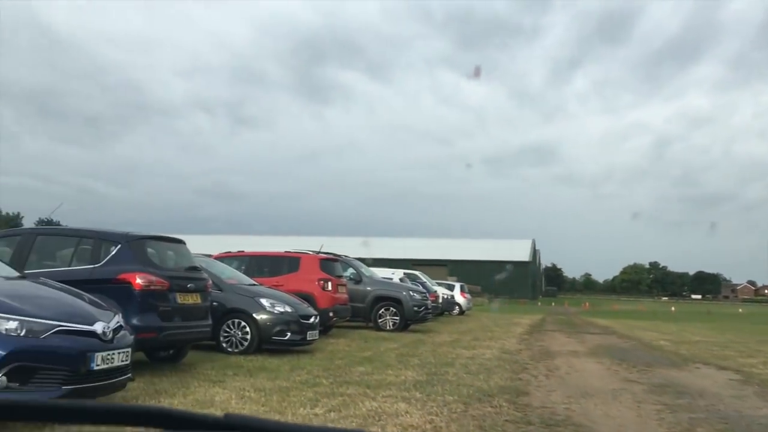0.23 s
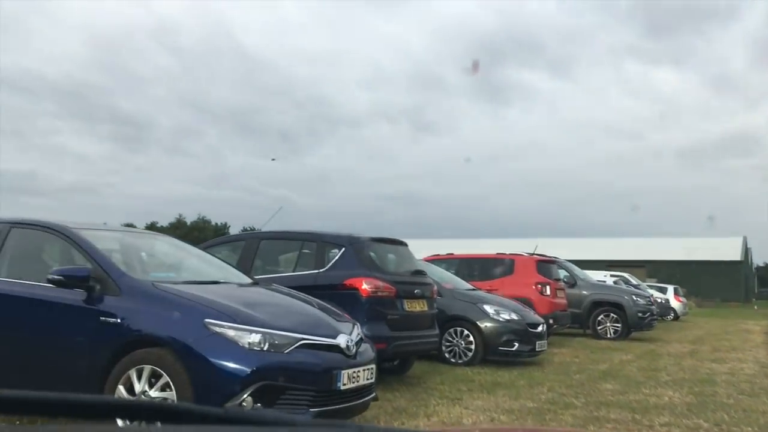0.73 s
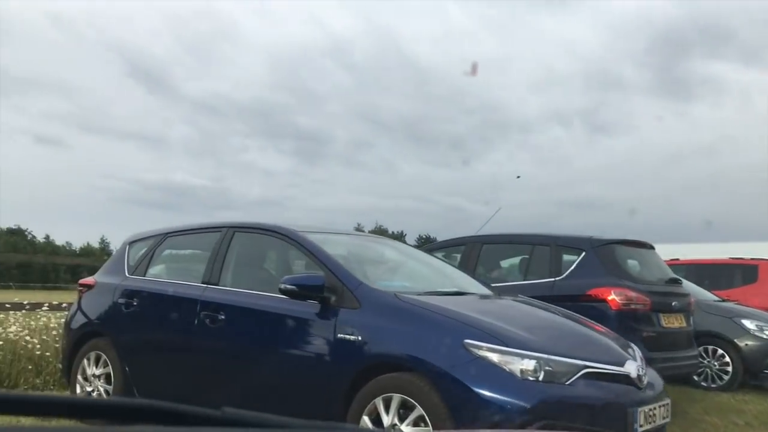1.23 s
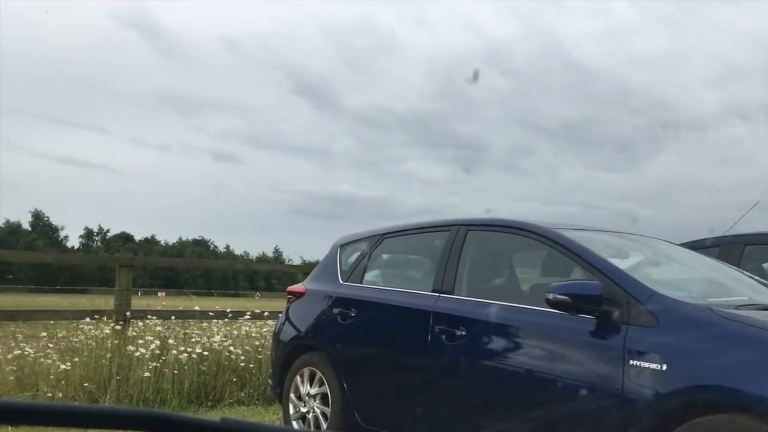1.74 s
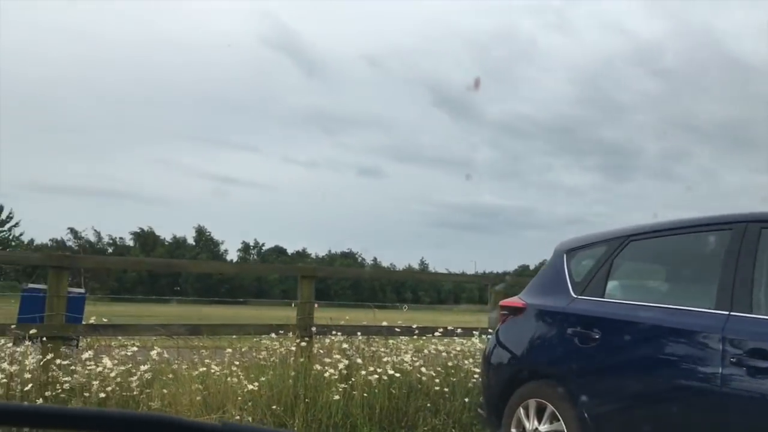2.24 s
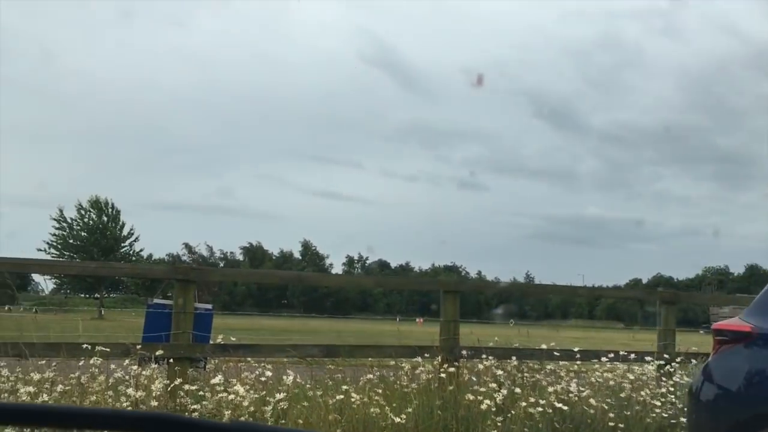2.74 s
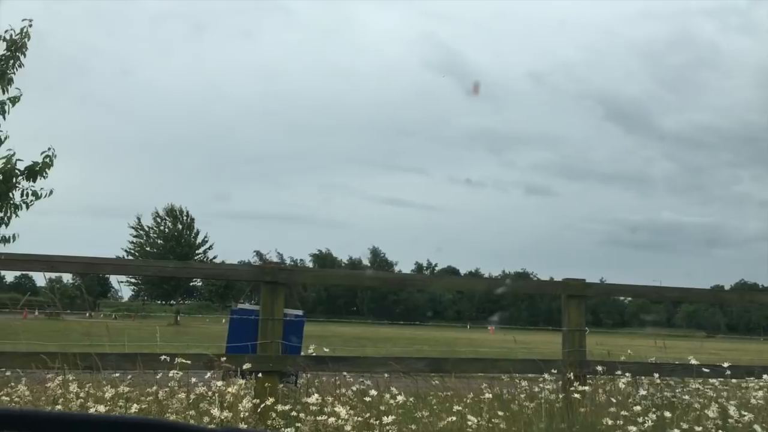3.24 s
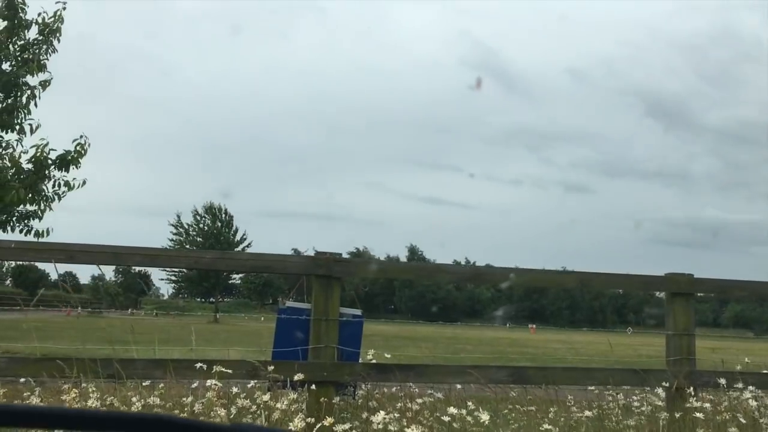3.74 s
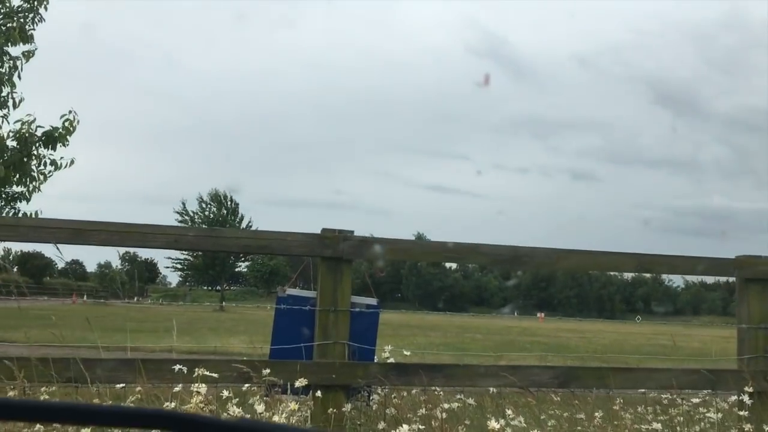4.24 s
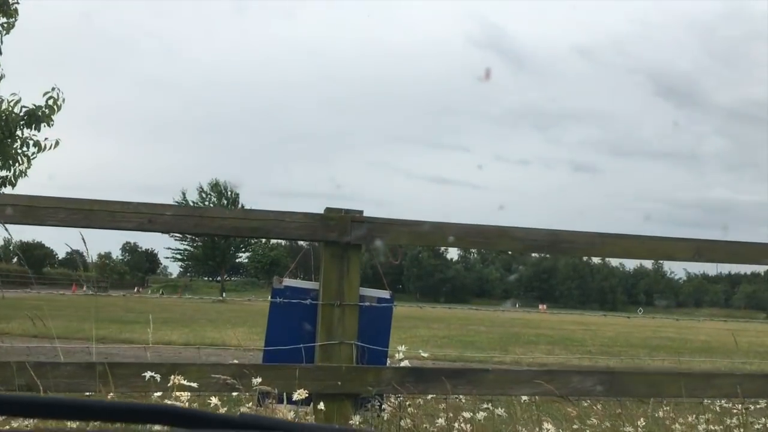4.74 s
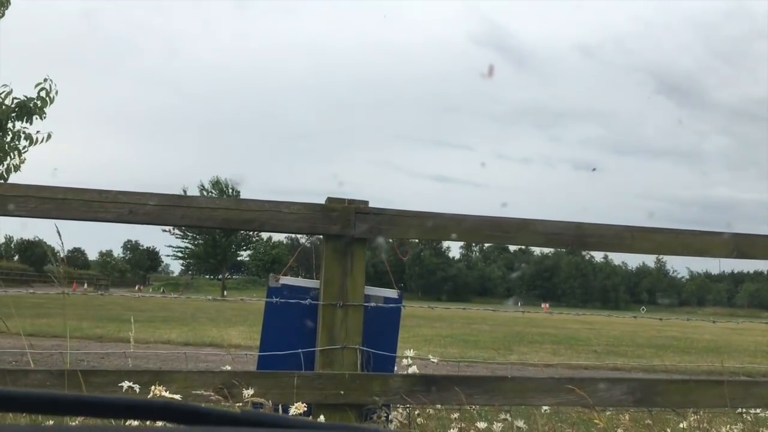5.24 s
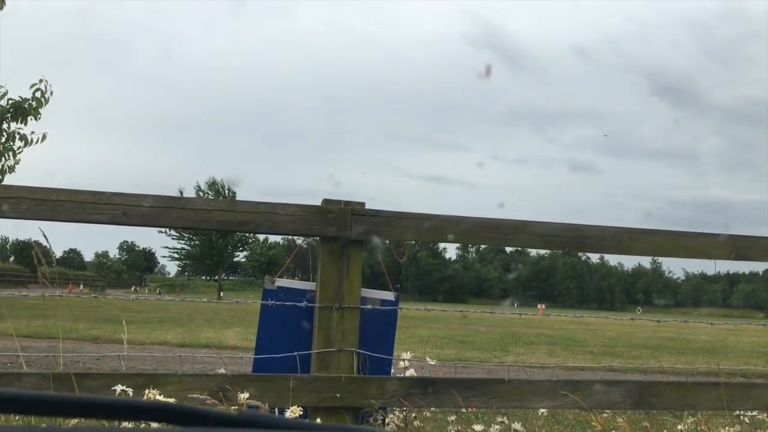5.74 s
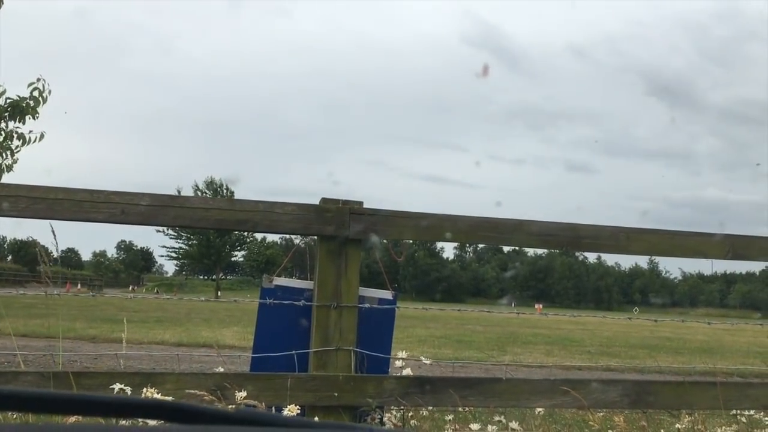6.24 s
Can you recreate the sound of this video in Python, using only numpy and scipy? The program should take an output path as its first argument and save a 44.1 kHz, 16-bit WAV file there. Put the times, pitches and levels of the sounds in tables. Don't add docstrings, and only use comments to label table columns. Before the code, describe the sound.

Inside a closed car cabin, with a close microphone and very short reflections. A low engine drone around 55 Hz wavers throughout, with soft, steady blower hiss above it. From 0 to 2 s bumpy grass gives a lumpy deep rumble, which then weakens. The indicator relay ticks at about 0.25, 0.95, 1.7 and 2.4 s, each followed within 0.07 s by a lower tock; the last tick is strongest, with a dull knock beside it. Tiny bright key clinks start around 1 s and are clearest from 2.9 to 4.8 s, notably at 3.57 and 3.88, then thin out. The engine sags to a lower, quieter idle after 5.3 s. A dull knock and click at 5.5 s precede a fast four-tooth handbrake ratchet at 5.64-5.73, rasping with a hollow thump. From 5.97 to 6.4 s, muffled floor thuds and light plastic clicks cluster, strongest near the end at 6.5 s.

```python
import sys
import numpy as np
from scipy import signal
from scipy.fft import rfft, irfft, next_fast_len
from scipy.io import wavfile

SR = 44100
rng = np.random.default_rng(int(sys.argv[2]) if len(sys.argv) > 2 else 0)


def int16_out(signal):
    q = np.round(np.clip(np.atleast_2d(signal).T, -1, 1) * 32767)
    wavfile.write(sys.argv[1], SR, q.astype(np.int16))


def gain_from_db(level_db):
    decades = np.asarray(level_db, float) / 20
    return 10 ** decades


N = 286764

# (time [s], firing tone [Hz], level [dB])
ENGINE_CURVE = [(0.0, 56.52, -31), (1.6, 55.67, -29), (2.0, 56.22, -32.5), (2.48, 55.78, -29),
                (3.29, 55.56, -33), (3.55, 54.26, -29), (3.89, 52.1, -32), (4.11, 54.53, -32),
                (4.36, 57.66, -36.5), (4.5, 58.6, -29.5), (4.8, 56.2, -31), (5.14, 55.94, -33.5),
                (5.23, 54.4, -31.5), (5.45, 48.1, -32.5), (5.7, 46.75, -38), (6.5, 46.93, -39)]
# (multiple of the firing tone [times], level [dB])
ENGINE_OVERTONES = [(2.0, -38), (4.0, -24.5)]
# (time [s], spread [s], change of the drone [dB])
DRONE_SWELLS = [(.025, 0.0066, 14), (.1, 0.04, -4), (.36, 0.048, 4.5), (.49, 0.036, 4), (.6, 0.039, 6.5),
                (.71, 0.023, -7), (.8, 0.042, 5), (.92, 0.039, -2), (1.04, 0.018, 1.5), (1.13, 0.027, -4),
                (1.24, 0.025, 5), (1.38, 0.066, -3.5), (1.5, 0.049, -5), (1.65, 0.019, -14),
                (1.8, 0.053, 5), (1.92, 0.015, -10), (5.97, 0.07, 0), (6.05, 0.029, 1), (6.22, 0.033, -3)]
# (lowest [Hz], highest [Hz])
ROAD_BANDS_HZ = [(28, 51.8), (72, 114), (115, 214)]
# (level on zero-dB ground [dB], share of the roughness that is passed on [0-1])
ROAD_STRENGTHS = [(-45, 0.97), (-31.5, 0.8), (-43.5, 0.22)]
# (time [s], roughness [dB])
GROUND_CURVE = [(0.0, 2.5), (.6, 2.5), (1.0, -0.5), (1.9, -11), (2.3, -9.5), (3.6, -10), (4.4, -10.5),
                (5.0, -10.5), (5.6, -16), (6.5, -12.5)]
# (time [s], spread [s], heave [dB], boom [dB], rumble [dB])
BODY_JOLTS = [(.19, 0.065, 13, -1.5, 1.5), (.33, 0.031, -15, -8, 8), (.62, 0.11, 13.5, -2.5, -1),
              (1.03, 0.081, 15.5, -4.5, 3), (1.4, 0.011, 22, 6.5, 8), (1.62, 0.074, 19, -0.5, 3.5),
              (1.8, 0.069, 23, 5.5, 4), (2.9, 0.27, 8, 0.5, -5), (3.5, 0.028, 3, -6, 6.5),
              (4.2, 0.069, 3, 4, 4.5), (4.5, 0.1, 4, 1.5, 8), (5.3, 0.22, -1, 3, 0),
              (5.7, 0.045, -3, 16, 15), (6.0, 0.25, 7, 8, 7.5), (6.035, .015, 0, -11, 0.5),
              (6.36, 0.067, -1, 7.5, 5), (6.46, 0.011, 1, -4, -6)]
# (frequency [Hz], level per Hz [dB])
BLOWER_COLOUR = [(120, -11), (200, 0), (320, -10.5), (400, -16.5), (829, -18.5), (1030, -22.5),
                 (1260, -27.5), (1490, -22.5), (1720, -30), (2140, -29), (2970, -37), (3760, -39.5),
                 (4770, -39.5), (15600, -54.5)]
# (frequency [Hz], width [Hz], change of the hiss [dB])
HISS_PEAKS = [(941, 44, 6.5), (1034, 77, 9), (1200, 86, 0), (1387, 87, 4.5), (1504, 98, 6), (1940, 270, 2),
              (2500, 75, -4), (3200, 114, 4), (3776, 300, 6), (550, 24, 3.5), (4810, 240, -10),
              (7900, 1050, -3.5), (10450, 600, -7.5), (13800, 3500, 3.5)]
# (time [s], spread [s], level [dB])
CLOTH_BRUSHES = [(.41, .065, -68.5), (1.0, .05, -76), (1.9, .08, -75), (2.6, .06, -76), (3.55, .08, -76),
                 (5.89, .013, -69.5), (6.15, .08, -78)]
# (time [s], peak [dB], tone [Hz])
FLOOR_KNOCKS = [(2.425, -26, 155), (5.49, -27.5, 177.8), (5.499, -32, 307), (5.89, -46, 118),
                (5.985, -18, 107.6), (6.007, -26, 96), (6.164, -24.5, 85.8), (6.192, -30, 191),
                (6.201, -18.5, 122), (6.267, -33, 92.1), (6.301, -15, 160.3), (6.345, -22.5, 105),
                (6.111, -32, 95), (6.373, -29.5, 334), (6.294, -32, 350), (6.382, -13, 123.5),
                (6.411, -15.5, 124.9)]
# (time [s], peak [dB], tone [Hz], hiss [dB])
CATCH_CLICKS = [(2.542, -51.5, 3200, -66), (5.493, -46.5, 2500, -66), (5.492, -56, 8870, -80),
                (5.969, -35.5, 2070, -53.5), (5.990, -31, 1040, -51.5), (6.07, -48, 2600, -64),
                (6.077, -51.5, 2600, -57)]
# (frequency [Hz], level [dB], time to fall 60 dB [s])
CATCH_RASP_TONES = [(3600, 3, .001), (5500, 2.5, 0.0014), (7600, -6, 0.002), (8940, -5, 0.002),
                    (12600, -2.5, 0.002), (15000, -7, 0.0015)]
# (time [s], peak [dB])
TRIM_SNAPS = [(.218, -56), (.918, -52), (1.025, -57), (4.017, -47.5), (4.148, -56), (5.818, -55),
              (5.846, -54), (6.476, -50)]
# (frequency [Hz], level [dB], time to fall 60 dB [s])
TRIM_TONES = [(6000, -4, .001), (8500, -3, .001), (11500, 0, .0008), (14500, 0, .0008)]
# (time [s], peak [dB], snap against the peak [dB])
RELAY_CLICKS = [
    (0.254, -36, -7.5),
    (0.322, -43, -4),
    (0.954, -36.5, -2.5),
    (1.002, -44, -15),
    (1.693, -35.5, -9),
    (1.7445, -36.5, -11),
    (2.41, -29.5, -8.5),
    (2.448, -39, -21),
]
# (frequency [Hz], level [dB], time to fall 60 dB [s])
TICK_TONES = [(650, -18.5, 0.021), (876, 8, 0.0073), (1226, -8.5, 0.067), (1430, -22, 0.0073),
              (1800, -5, 0.0097), (2125, -3, 0.012), (2710, -4.5, 0.0076), (3200, -19.5, 0.013)]
# (frequency [Hz], level [dB], time to fall 60 dB [s])
TOCK_TONES = [(727, -1, 0.042), (930, -13, 0.01), (1100, 7.5, 0.0086), (1440, -15, 0.011),
              (1650, -10.5, 0.062), (2180, -6, 0.021)]
# (frequency [Hz], level [dB], time to fall 60 dB [s])
TICK_SNAP_TONES = [(3590, 1.5, 0.0018), (4400, 3, 0.0046), (5570, -8, 0.0024), (6130, -21, 0.01),
                   (7700, -25, 0.0021), (8240, -1.5, 0.00057), (11100, -3, 0.0012), (14100, -14, .002)]
# (frequency [Hz], level [dB], time to fall 60 dB [s])
TOCK_SNAP_TONES = [(2750, -9, .006), (3800, 1, 0.0045), (4430, -8, 0.003), (6240, 2, 0.0033),
                   (8000, -2, 0.0017), (10500, -4, 0.0012), (12800, -4, .0015)]
# (time [s], peak [dB], note [Hz])
SMALL_KEY_TOUCHES = [(0.2952, -62, 12600), (0.9911, -58, 11900), (1.044, -53, 12500), (1.1323, -58, 11800),
                     (1.1672, -52, 13200), (1.2244, -52, 12400), (1.3239, -51, 12000), (1.3593, -49, 12400),
                     (1.492, -60, 11900), (1.5324, -49, 12400), (1.7355, -56, 12200), (2.2887, -55, 12700),
                     (2.3304, -63, 12400), (2.362, -48, 12000), (2.4548, -48, 12400), (2.6978, -58, 12990),
                     (2.9259, -44, 12200), (2.9637, -58, 13680), (2.982, -42, 11800), (3.0804, -50, 12400),
                     (3.1687, -61, 13100), (3.1864, -60, 11900), (3.2044, -54, 12600), (3.2241, -52, 12400),
                     (3.2715, -55, 12400), (3.2972, -36, 12600), (3.4176, -56, 12400), (3.5478, -58, 12600),
                     (3.5653, -41, 12600), (3.677, -49, 12200), (3.6924, -51, 12300), (3.8048, -63, 12500),
                     (3.8835, -32, 12400), (3.9335, -56, 12350), (4.0806, -64, 14200), (4.1604, -57, 12600),
                     (4.1764, -39, 11810), (4.2723, -51, 12400), (4.5126, -45, 12400), (4.6319, -54, 13900),
                     (4.778, -38, 12600), (5.1188, -62, 14000), (5.3817, -50, 12600), (6.2223, -50, 13000)]
# (frequency [Hz], level [dB], time to fall 60 dB [s])
SMALL_KEY_TONES = [(12400, -17, 0.012), (12950, -8, .006), (13600, -9, .006), (14500, -10, .006)]
# (time [s], peak [dB], note [Hz])
KEY_PINGS = [(2.860, -66, 11200), (2.926, -52, 5500), (3.080, -58, 5500), (3.567, -50, 5560),
             (3.586, -55, 5500), (3.616, -62, 9300), (3.680, -61, 5400), (3.884, -50, 6260),
             (4.068, -65, 9300), (4.147, -63, 11590), (4.178, -50, 5420), (4.178, -51, 6300),
             (3.224, -58, 4400), (.604, -66, 15200), (1.044, -58, 9270), (1.19, -62, 15200),
             (1.296, -67, 12700), (1.408, -62, 11800), (1.632, -58, 11100), (2.089, -66, 11500),
             (2.089, -66, 15300), (2.138, -65, 12700), (2.184, -63, 9300), (2.219, -66, 9500),
             (2.219, -65, 11200), (2.473, -60, 6000), (2.541, -51.5, 4400), (2.543, -63, 9300),
             (2.543, -56, 11600), (2.568, -65, 15300), (2.66, -65, 9300), (2.76, -64, 9400),
             (2.815, -63, 9300), (3.296, -50, 4340)]
# (time [s], long key [dB], fob [dB], flat key [dB], short key [dB])
KEY_CLINKS = [(1.0241, -70, -51, -71, -72), (1.044, -46.5, -69, -59, -66), (1.2263, -41.5, -51, -52, -51),
              (1.36, -46, -47, -67, -51), (1.533, -48, -49, -57, -55), (1.6395, -46, -59, -57.5, -61),
              (1.831, -49, -59, -58, -64), (2.2403, -51, -64, -58.5, -69), (2.29, -44.5, -48, -59, -61),
              (2.454, -40.5, -51, -59, -58), (2.926, -36, -51, -55, -51), (3.0823, -38.5, -53, -56, -53),
              (3.2237, -46.5, -57, -61, -57), (3.297, -44, -49, -45.5, -50),
              (3.5666, -29.5, -41, -37.5, -52), (3.678, -39, -53, -56, -52), (3.8837, -29, -53, -33.5, -47),
              (3.9328, -54, -53, -58, -59), (4.179, -42, -39, -42, -48), (4.2721, -36.5, -54, -63, -64),
              (4.512, -43, -49, -45, -57), (4.67, -56, -65, -58, -66), (4.778, -46, -53, -52, -60),
              (5.382, -53, -61, -61, -61)]
# (time [s], long key [dB], short key [dB])
KEY_GRAZES = [(.2956, -70, -72), (.631, -56, -78), (2.545, -57, -59), (.9911, -55, -70),
              (1.1314, -49.5, -75), (1.1672, -59, -69), (1.2075, -58, -64), (1.238, -40.5, -62),
              (1.324, -45.5, -56), (1.3744, -58, -60), (1.4082, -54, -77), (1.493, -50, -73),
              (1.5494, -51, -55), (1.735, -50, -71), (1.8799, -50, -75), (1.9779, -54, -57),
              (2.0527, -60, -67), (2.1844, -52, -66), (2.3326, -57, -60), (2.362, -44, -62),
              (2.6993, -51, -75), (2.7594, -57, -66), (2.815, -56, -69), (2.9404, -54, -65),
              (2.981, -45, -55), (3.418, -68, -60), (3.585, -40, -63), (3.6944, -42, -62),
              (3.8072, -54, -67)]
# (time [s], long key [dB])
KEY_TOUCHES = [(.03, -62), (.522, -63), (.606, -63), (.8838, -60), (2.66, -55), (4.07, -61), (4.191, -52),
               (4.70, -58), (4.795, -49), (5.069, -63), (5.118, -56), (5.289, -56), (4.57, -72)]
# (frequency [Hz], level [dB], time to fall 60 dB [s])
KEY_TONES = [
    [(11200, 0, .022), (11450, -10, .012), (11030, -6, .022), (11800, -12, .008)],
    [(4340, 0, .028)],
    [(5510, -4, .022), (6260, -11, .02)],
    [(9300, 0, .024), (8930, -16, .015)],
    [(15300, 0, .024), (14800, -9, .01), (15700, -12, .006)],
]
# (time [s], pawl peak [dB], hiss [dB], note of the tooth [Hz], note level [dB])
BRAKE_TEETH = [
    (5.642, -21.5, -36.5, 2690, -27),
    (5.67, -22, -31.5, 2430, -27),
    (5.7014, -24, -33.5, 2360, -29),
    (5.7323, -27.5, -36, 2424, -27.5),
]
# (frequency [Hz], level [dB], time to fall 60 dB [s])
PAWL_TONES = [(774, -5, 0.022), (1040, -5.5, 0.042), (1260, -11, 0.012), (1470, -14, .03),
              (1724, -17.5, 0.046), (2240, -14.5, 0.066), (2750, -7, 0.024), (3366, -1.5, 0.0062),
              (3670, -7, 0.0083), (4240, -18, 0.0051)]
# (frequency [Hz], level [dB], time to fall 60 dB [s])
TOOTH_RASP_TONES = [(4500, 4, 0.0011), (5800, 0.5, 0.0014), (7260, -12, 0.00097), (9210, -7.5, 0.0046),
                    (11200, -5.5, 0.0034), (13400, -0.5, 0.0017), (15200, -11, 0.0022)]
# (time [s], push [dB])
LEVER_PUSHES = [(5.6464, -18), (5.6747, -16.5), (5.693, -24.5), (5.7021, -21), (5.7122, -18.5),
                (5.737, -26.5), (5.743, -26)]
# (frequency [Hz], level [dB], time to fall 60 dB [s])
LEVER_TONES = [(105, -10, 0.16), (134, -4, 0.18), (199, -30, 0.051), (255, 6.5, 0.087), (297, 2, 0.047),
               (369, -8.5, 0.058), (448, -7.5, 0.042), (626, -14, 0.048)]

EVEN_DB, SCATTER_DB, KEY_SCATTER_DB = 0, 1.5, 2.2


def rms_one(x):
    return x / np.sqrt(np.mean(x ** 2) + 1e-20)


def in_time(rows):
    s, *columns = np.transpose(rows)
    return [np.interp(np.arange(N) / SR, s, column) for column in columns]


def swells(rows):
    s, spread, *columns = np.transpose(rows)
    t = np.arange(0, N, 32) / SR
    bells = np.exp(-.5 * ((t[:, None] - s) / spread) ** 2)
    return [np.interp(np.arange(N) / SR, t, bells @ column) for column in columns]


def drift(rate):
    r = np.exp(-80 * np.pi * rate / SR)
    noise = rng.standard_normal(N // 40 + 2002)
    slow = signal.lfilter([1], [1, -2 * r, r * r], noise)[2000:]
    return np.interp(np.arange(N) / 40, np.arange(len(slow)), rms_one(slow))


def band(x, low_hz, high_hz, order=2):
    edges_hz = [low_hz, min(high_hz, SR * .49)]
    return signal.sosfilt(signal.butter(order, edges_hz, "band", fs=SR, output="sos"), x)


def ring(x, hz, t60):
    r, w = gain_from_db(-60 / (t60 * SR)), 2 * np.pi * hz / SR
    return signal.lfilter([0, np.sin(w)], [1, -2 * r * np.cos(w), r * r], x + 1e-18)


def strike(times, peaks_db, tones, chatter_s, spread_db):
    out, t = np.zeros(N), np.arange(1600) / SR
    first = round(min(times) * SR)
    last = min(round((max(times) + .4) * SR), N)
    shape = t / chatter_s * np.exp(-1.4 * t / chatter_s)
    for hz, level_db, t60 in tones:
        draw = rng.standard_normal((len(times), 1601))
        chances, contacts = draw[:, 0], draw[:, 1:] * shape
        fed = np.abs(contacts @ np.exp(-2j * np.pi * hz * t)) ** 2
        contacts = contacts / np.sqrt(.75 * fed + .25 * np.sum(shape ** 2))[:, None]
        push = np.zeros(N + 1600)
        for s, db, contact, chance in zip(times, peaks_db, contacts, chances):
            push[round(s * SR):][:1600] += gain_from_db(db + level_db + spread_db * chance) * contact
        out[first:last] += ring(push[first:last], hz, t60)
    return out


def cabin(x):
    t = np.arange(4000) / SR
    fall = gain_from_db(-60 * t / .041)
    echoes = rng.standard_normal(4000) * fall * (t > .0015)
    return x + gain_from_db(-10) * signal.fftconvolve(x, echoes / np.linalg.norm(echoes))[:N]


def blower():
    size = next_fast_len(N)
    hz = np.maximum(np.arange(size // 2 + 1) * SR / size, 1)
    colour_hz, level_db = np.transpose(BLOWER_COLOUR)
    colour_db = np.interp(np.log(hz), np.log(colour_hz), level_db)
    for peak_hz, width_hz, db in HISS_PEAKS:
        colour_db += db / (1 + (2 * (hz - peak_hz) / width_hz) ** 4)
    air = rfft(rng.standard_normal(size)) * gain_from_db(colour_db)
    out, gusts = 0, drift(27.0)
    for octave in range(7, 15):
        share = np.cos(np.pi / 2 * np.clip(np.log2(hz) - octave, -1, 1)) ** 2
        out = out + irfft(air * share, size)[:N] * gain_from_db(1.0 * gusts + 0.66 * drift(18.5))
    return gain_from_db(-52) * out / np.std(band(out, 400, 2500))


def road():
    out, bumps = 0, drift(4.2)
    rough_db, = in_time(GROUND_CURVE)
    for (low_hz, high_hz), (level_db, share), jolt_db in zip(
            ROAD_BANDS_HZ, ROAD_STRENGTHS, swells(BODY_JOLTS)):
        shake = band(rng.standard_normal(N + SR), low_hz, high_hz)[SR:]
        shake = rms_one(shake * gain_from_db(0.61 * bumps + 1.0 * drift(2.9)))
        out = out + gain_from_db(level_db + share * rough_db + jolt_db) * shake
    return out


def engine():
    hz, level_db = in_time(ENGINE_CURVE)
    phase = 2 * np.pi * np.cumsum(hz * (1 + 0.0042 * drift(7.5))) / SR
    tone = gain_from_db(1.1 * drift(9.0) + 0.8 * drift(5.5)) * np.sin(phase)
    for multiple, db in ENGINE_OVERTONES:
        tone += gain_from_db(db + 5.6 * drift(7.9)) * np.sin(multiple * phase)
    return np.sqrt(2) * gain_from_db(level_db + swells(DRONE_SWELLS)[0]) * tone


def cloth():
    t = np.arange(N) / SR
    swell = sum(gain_from_db(db) * np.exp(-.5 * ((t - s) / spread) ** 2) for s, spread, db in CLOTH_BRUSHES)
    hiss = rms_one(band(rng.standard_normal(N), 10200, 15500, order=1))
    return swell * gain_from_db(2.5 * drift(25.0)) * hiss


def knocks():
    rings = 0
    for s, db, hz in FLOOR_KNOCKS:
        tones = [(hz, 0, .08), (195, -18, .08), (270, -20, .08), (355, -15, .08)]
        rings = rings + strike([s - .005], [db], tones, chatter_s=0.0063, spread_db=EVEN_DB)
    return band(rings, 58, 334, order=3)


def catches():
    s, peak_db, note_hz, hiss_db = np.transpose(CATCH_CLICKS)
    notes = 0
    for at, db, hz in zip(s, peak_db, note_hz):
        tones = [(hz, 0, .03), (3000, -6, .002)]
        notes = notes + strike([at + 0.00097], [db], tones, chatter_s=0.004, spread_db=EVEN_DB)
    rasp = strike(s - .002, hiss_db + 15.0, CATCH_RASP_TONES, chatter_s=0.0044, spread_db=SCATTER_DB)
    return notes + rasp


def trim():
    s, db = np.transpose(TRIM_SNAPS)
    return strike(s - .001, db, TRIM_TONES, chatter_s=0.0017, spread_db=SCATTER_DB)


def relay():
    s, peak_db, snap_db = np.transpose(RELAY_CLICKS)
    close_s, release_s = s[::2], s[1::2]
    snap_db = peak_db + snap_db + 3
    tick = strike(close_s + 0.00045, peak_db[::2] - 2.5, TICK_TONES,
                  chatter_s=0.0034, spread_db=SCATTER_DB)
    tock = strike(release_s - .001, peak_db[1::2] + .7, TOCK_TONES,
                  chatter_s=.004, spread_db=SCATTER_DB)
    tick_snap = strike(close_s - .0005, snap_db[::2], TICK_SNAP_TONES,
                       chatter_s=.003, spread_db=SCATTER_DB)
    tock_snap = strike(release_s - .002, snap_db[1::2], TOCK_SNAP_TONES,
                       chatter_s=.0035, spread_db=SCATTER_DB)
    return tick + tock + tick_snap + tock_snap


def small_key():
    s, db, _ = np.transpose(SMALL_KEY_TOUCHES)
    out = strike(s - .001, db + 2, SMALL_KEY_TONES, chatter_s=0.0026, spread_db=KEY_SCATTER_DB)
    for at, level_db, hz in SMALL_KEY_TOUCHES:
        out += strike([at - .001], [level_db - 4.0], [(hz, 0, .018)], chatter_s=0.0023, spread_db=EVEN_DB)
    for at, level_db, hz in KEY_PINGS:
        out += strike([at], [level_db], [(hz, 0, .025)], chatter_s=0.0017, spread_db=EVEN_DB)
    return out


def keys():
    clink_s, long_db, fob_db, flat_db, short_db = np.transpose(KEY_CLINKS)
    ring_db = -68 + .9 * (flat_db + 57)
    touches = [(s, db, db - 17) for s, db in KEY_TOUCHES]
    graze_s, thin_db, tip_db = np.transpose(list(KEY_GRAZES) + touches)
    leak_db = thin_db - 26
    s = np.r_[clink_s, graze_s, clink_s - .018]
    clinks_db = [long_db, ring_db, fob_db, flat_db, short_db]
    grazes_db = [thin_db, leak_db - 5, leak_db, leak_db + 6.0, tip_db]
    forces_db = [np.r_[hard, soft, hard - 40] for hard, soft in zip(clinks_db, grazes_db)]
    offsets_db = [-5.0, 3.5, -4.0, 0.5, 7.0]
    rings = 0
    for db, offset_db, tones in zip(forces_db, offsets_db, KEY_TONES):
        rings = rings + strike(s - .001, db + offset_db, tones, chatter_s=0.0032, spread_db=KEY_SCATTER_DB)
    click_tones = [(6760, -27, 0.0018), (10200, -19, 0.0015), (12400, 0, .0015), (15000, -7, .002)]
    click = strike(s - .001, forces_db[0] - 15, click_tones, chatter_s=.0025, spread_db=SCATTER_DB)
    return rings + click


def lever_thump():
    s, db = np.transpose(LEVER_PUSHES)
    push, soft = np.zeros(N), np.exp(-1 / (0.00028 * SR))
    push[(s * SR).astype(int)] = gain_from_db(db - 1.0)
    push = signal.lfilter([(1 - soft) ** 2], [1, -2 * soft, soft ** 2], push + 1e-18)
    thump = 0
    for k, (hz, level_db, t60) in enumerate(LEVER_TONES):
        thump = thump + (-1) ** k * gain_from_db(level_db) * ring(push, hz, t60)
    return band(thump, 51, 860)


def handbrake():
    s, pawl_db, hiss_db, note_hz, note_db = np.transpose(BRAKE_TEETH)
    pawl = strike(s - .002, pawl_db - 3.0, PAWL_TONES, chatter_s=0.0059, spread_db=SCATTER_DB)
    for at, hz, db in zip(s, note_hz, note_db):
        pawl += strike([at], [db], [(hz, -1.5, .016)], chatter_s=0.0053, spread_db=EVEN_DB)
    rasp = strike(s - .002, hiss_db + 8.5, TOOTH_RASP_TONES, chatter_s=0.0049, spread_db=SCATTER_DB)
    squeak = strike([5.629], [-42], [(2720, 0, 0.091)], chatter_s=0.0063, spread_db=EVEN_DB)
    return cabin(pawl + rasp + squeak) + lever_thump()


def scene():
    bed = blower() + road() + engine() + cloth()
    small_sounds = cabin(catches() + trim() + relay() + small_key() + keys())
    return (bed + knocks() + small_sounds + handbrake())[None]


def band_limit(x):
    return signal.sosfilt(signal.butter(12, 16510, fs=SR, output="sos"), x)


def record(dry):
    fade_in = np.minimum(np.arange(N) / SR / .0001, 1)
    top_cut = signal.ellip(8, .5, 34, 15750, fs=SR, output="sos")
    bass_cut = signal.butter(2, 23, "high", fs=SR, output="sos")
    mix = signal.sosfilt(bass_cut, signal.sosfilt(top_cut, dry * fade_in))
    return band_limit(mix)


dry = scene()
out = record(dry)
int16_out(out)
```